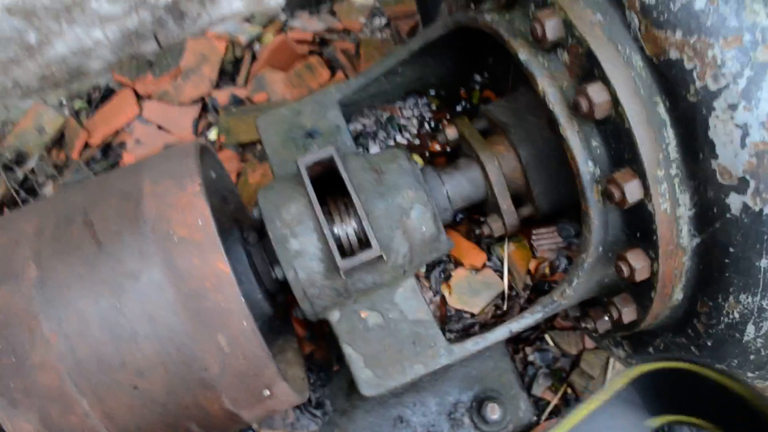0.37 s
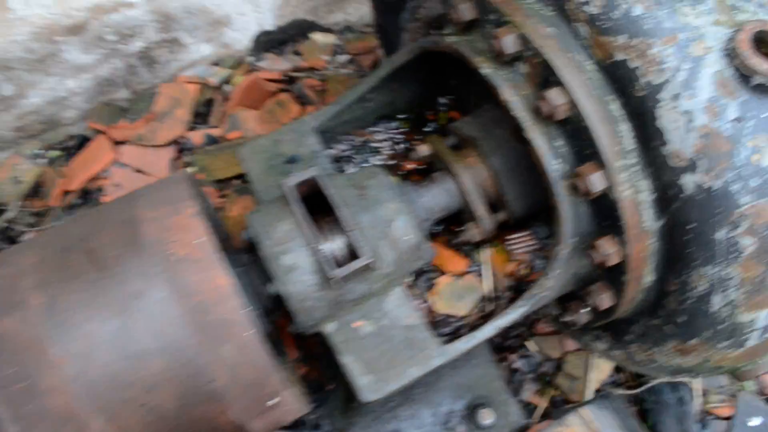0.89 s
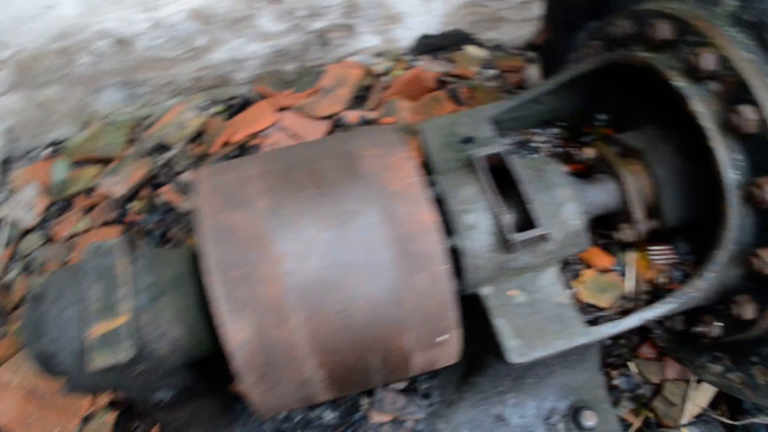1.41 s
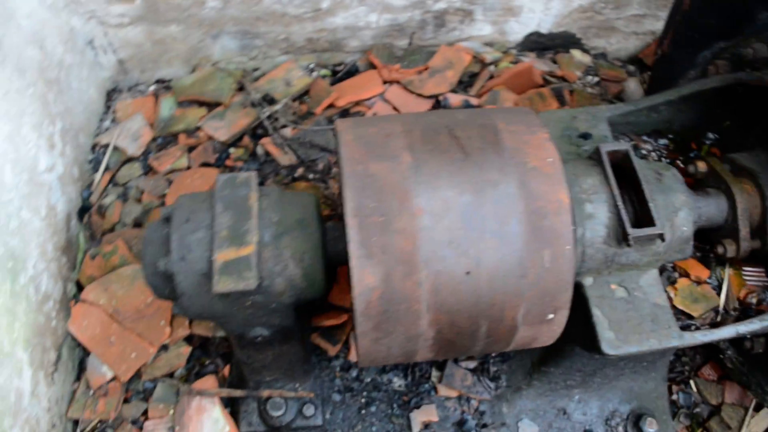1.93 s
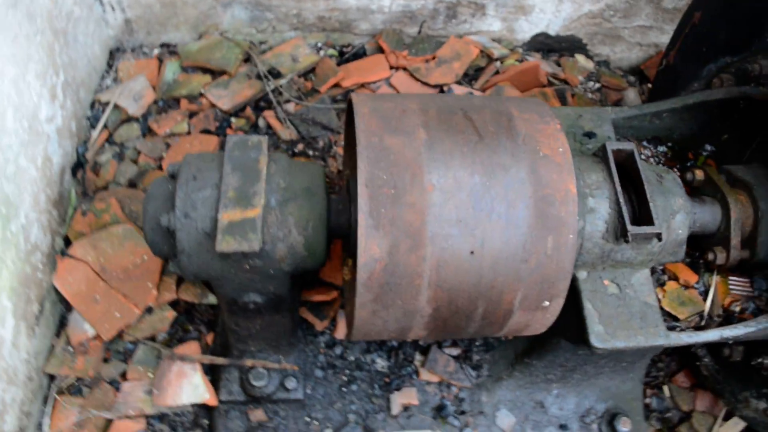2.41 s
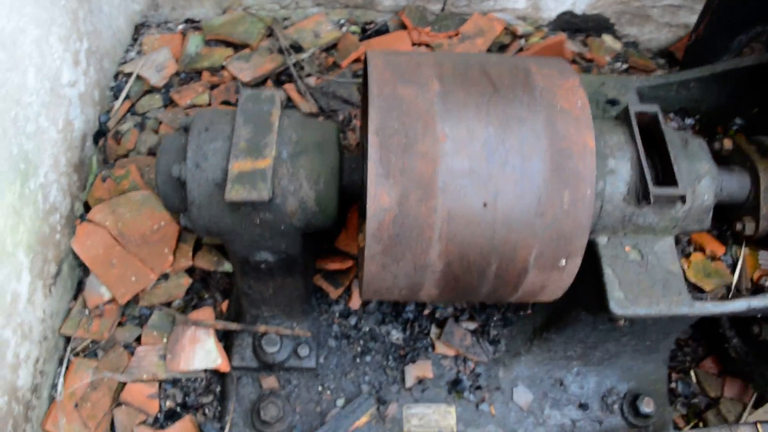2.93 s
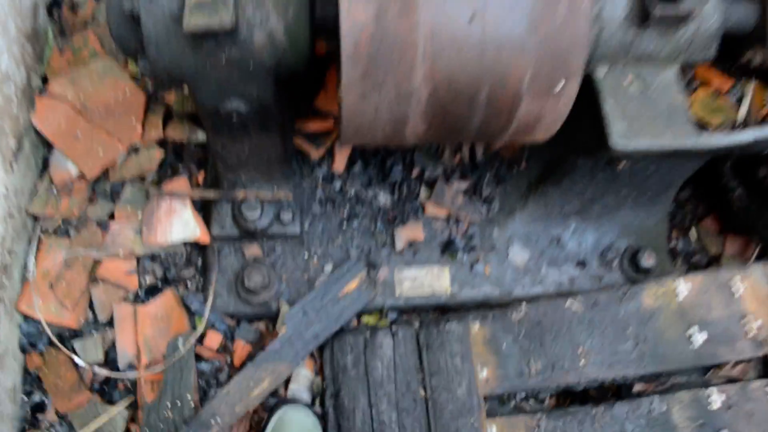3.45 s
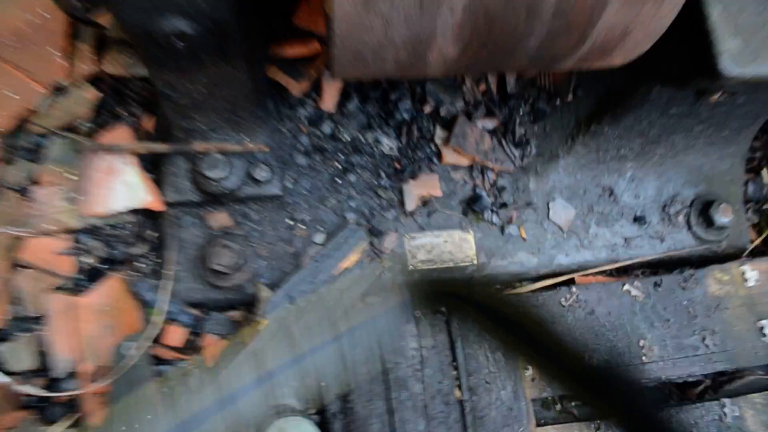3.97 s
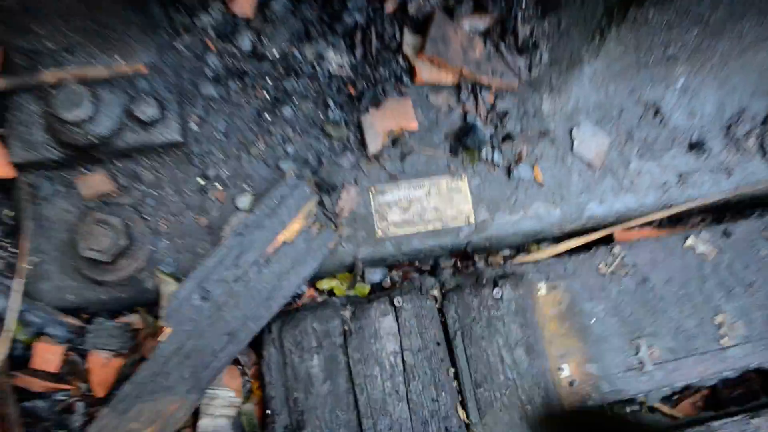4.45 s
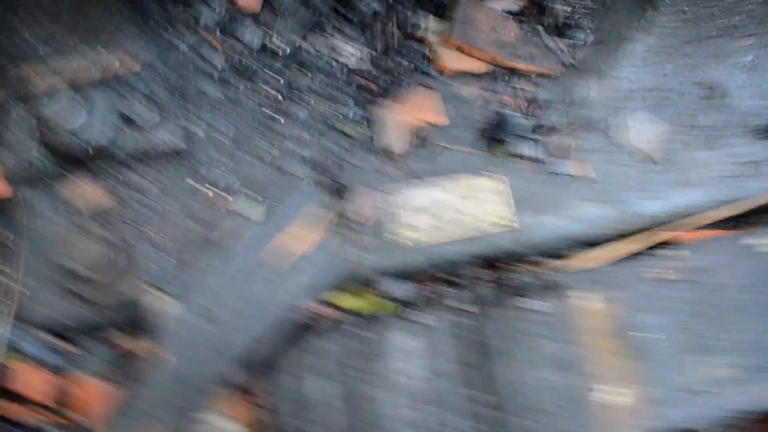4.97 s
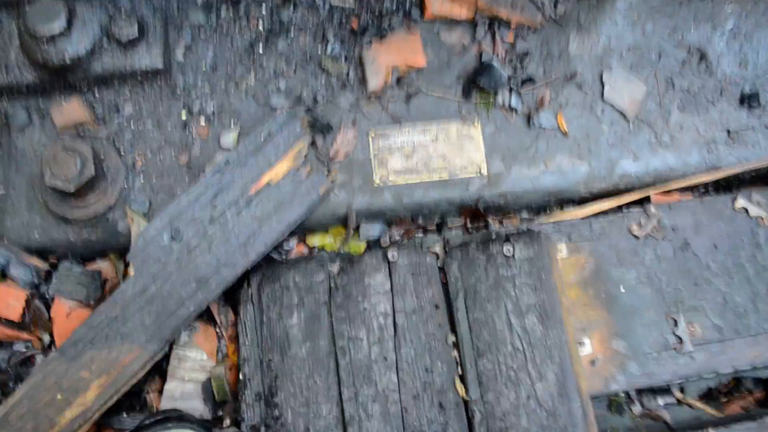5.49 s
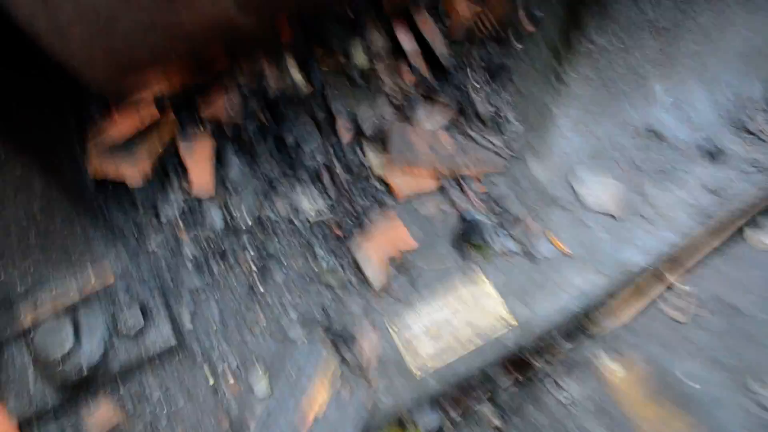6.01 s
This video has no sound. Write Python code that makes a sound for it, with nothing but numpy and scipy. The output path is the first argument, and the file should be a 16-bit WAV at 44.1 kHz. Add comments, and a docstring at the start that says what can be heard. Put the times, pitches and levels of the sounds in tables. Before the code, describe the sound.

Close to a small microphone in a roofless, hard-walled ruin, shoes shift on broken tiles and burnt planks. Small knocks, ticks and low creaks come sparsely, then a sharp bright tile clack and, half a second later, a heavier, lower double knock with plank thump, gritty crunch and tiny metal jingle. It settles into near quiet over distant traffic, ending with a few scrapes and snaps.

```python
"""Inside a roofless building, someone shifts their feet on broken roof tiles and charred planks.
Tiles knock, tick, snap and ping as struck decaying modes; planks thump as damped swings.
Scuffed grit, rustling cloth and creaking planks are shaped grains of noise; a small buckle jingles.
Behind lie a traffic wash of filtered noise, a low blurred engine tone and a faint electronic whine.
One small microphone hears it all, along with echoes from the walls."""
import sys
import numpy as np
from scipy import signal
from scipy.fft import rfft, irfft
from scipy.io import wavfile
from scipy.ndimage import uniform_filter1d

SR = 44100
rng = np.random.default_rng(int(sys.argv[2]) if len(sys.argv) > 2 else 0)


def attenuation_scalar(level_db):
    """Turn a level in dB into a linear amplitude multiplier (20 dB per decade)."""
    decades = np.asarray(level_db, float) / 20
    return 10 ** decades


def waveform_to_disk(signal):
    """Save audio, clipped to [-1, 1], as 16-bit WAV at the path in sys.argv[1]."""
    frames = np.transpose(np.atleast_2d(signal))
    scaled = np.clip(frames, -1, 1) * 32767
    samples = np.round(scaled).astype(np.int16)
    wavfile.write(sys.argv[1], SR, samples)


N = 269892  # length [samples]
# All source levels are those arriving at the microphone, before it rounds and filters them.


def evened(x):
    """Scales a signal to an rms of 1."""
    return x / np.sqrt(np.mean(x ** 2) + 1e-20)


def read(points, hz):
    """Reads a (frequency, value) table along a logarithmic frequency axis."""
    f, value = np.transpose(points)
    return np.interp(np.log(hz + 1), np.log(f + 1), value)


def curve(rows, axis):
    """Draws one column of a timed table as a line through the whole scene."""
    rows = np.array(rows)
    return np.interp(np.arange(N) / SR, rows[:, 0], rows[:, axis])


def add(mix, s, sound):
    """Lays a sound into the mix at a time in seconds, cutting what runs past the end."""
    part = mix[max(round(s * SR), 0):][:len(sound)]
    part += sound[:len(part)]


def peaked(x, db):
    """Scales a sound to a peak level in dB."""
    return attenuation_scalar(db) * x / np.abs(x).max()


def band(x, low_hz, high_hz, order=2):
    """Keeps the band between two frequencies."""
    sos = signal.butter(order, [low_hz, high_hz], "bandpass", fs=SR, output="sos")
    return signal.sosfilt(sos, x)


def ring(hz, t60, size=6000):
    """One struck mode: a sine that falls 60 dB in t60 seconds, never faster than in 2 ms."""
    t = np.arange(size) / SR
    return attenuation_scalar(-60 * t / max(t60, 0.002)) * np.sin(2 * np.pi * hz * t)


def coloured(x, points):
    """Weights the spectrum by a (frequency, dB) table and evens the result to an rms of 1."""
    hz = np.fft.rfftfreq(len(x), 1 / SR)
    return evened(irfft(rfft(x) * attenuation_scalar(read(points, hz)), len(x)))


# The tones that tiles and boards ring with: (frequency [Hz], level at 0 dB per octave brightness [dB])
RUBBLE_MODES = [(720, 15), (850, 18.5), (1000, 21), (1230, 14.5), (1500, 19), (1800, 18), (2050, 16),
                (2350, -12), (2750, -24), (3300, -10.5)]


def knock(hz, crunch_db, bright_db, noise):
    """A sharp blow, then crumbling, drives a hollow note and the rubble's modes, tilted by brightness."""
    crumble_s, rubble_t60, hollow_cycles = 0.005, 0.013, 5  # the hollow note falls 60 dB in 5 cycles
    contact = 0.27 * noise * np.exp(-np.arange(len(noise)) / (crumble_s * SR))
    contact[0] = 3  # the blow itself
    modes = np.zeros(1500)
    for (f, db), n in zip(RUBBLE_MODES, noise[::-1]):
        # each piece differs a little in pitch, and in the direction it first moves
        mode = ring(f * (1 + 0.067 * n), rubble_t60, size=1500)
        modes += attenuation_scalar(db + bright_db * np.log2(f / 1000)) * mode * np.sign(n)
    hollow = ring(hz, hollow_cycles / hz, size=1500)
    sound = peaked(signal.fftconvolve(contact, hollow), 0)
    add(sound, 0, peaked(signal.fftconvolve(contact, modes), crunch_db))
    return peaked(band(sound, 195, 4000, order=3), 0)


# Tiles and boards knocked by a shoe: (time [s], direct peak [dB], hollow pitch [Hz],
# crunch relative to the hollow note [dB], brightness [dB per octave])
TILE_KNOCKS = [(0.066, -27, 450, -14, 6), (0.124, -31.5, 704, -8, -3), (0.221, -36.5, 519, 1, -3),
               (0.257, -32.5, 342, 2, -12), (0.456, -17, 467, 7.5, 4.5), (0.738, -38, 495, 4, 2),
               (0.775, -28.5, 810, 3, -6), (0.997, -37, 506, -3, 4), (1.966, -26.5, 428, 12, 8),
               (2.372, -34.5, 760, 10, -5), (2.418, -37, 428, 0, -1), (2.449, -31.5, 580, -0.5, -9),
               (2.826, -29.5, 780, -7, -10), (2.914, -22, 814, 29, 0.5), (3.198, -23, 620, 1, -9),
               (3.266, -22.5, 624, -5.5, -15), (3.292, -13, 700, -11, -9), (3.2965, -13, 580, -7, -2),
               (3.309, -3, 610, -1.5, 8.5), (3.329, -16, 413, -0.5, 0), (3.382, -13.5, 616, -2, 2),
               (3.462, -30, 681, -2, -5), (3.473, -26, 600, -2, -5), (3.512, -25, 712, -10, -12),
               (3.537, -28, 700, 0, -3), (3.551, -28, 740, 3, -1), (3.706, -31.5, 743, 3, 1),
               (3.722, -30, 743, 4, 1), (3.751, -25, 791, 3, -2), (3.843, -2, 430, -3, -5),
               (3.85, -1.5, 440, -3, -10), (3.855, -11, 383, -8, 11), (3.867, -9, 400, 1, -6),
               (3.974, -23, 330, 0, -6), (4.019, -27, 785, 3, -1), (5.737, -31.5, 301, -3, 6),
               (5.765, -24.5, 322, 1, -26), (5.934, -25.5, 450, 3, -3)]


def knocks():
    """Every knock, direct and thrown back by the walls; each spot has its own echoes."""
    # faint knocks are further off and carry more echo
    echo_db, echo_db_per_db = -2, -0.1384  # echo share at a -26.5 dB knock, change per dB of peak
    out = np.zeros(N)
    noises = rng.standard_normal((len(TILE_KNOCKS), 2500))
    for (s, db, hz, crunch_db, bright_db), noise in zip(TILE_KNOCKS, noises):
        sound = attenuation_scalar(db) * knock(hz, crunch_db, bright_db, noise)
        add(out, s, sound)
        add(out, s, attenuation_scalar(echo_db + echo_db_per_db * (db + 26.5)) * walls(sound))
    return out


# Planks thumping under weight: (time [s], direct peak [dB], pitch [Hz], t60 [s])
PLANK_THUMPS = [(0.0, -25.5, 260, 0.14), (0.064, -33, 185, 0.071), (0.122, -38.5, 149, 0.08),
                (0.247, -43.5, 240, 0.16), (0.462, -40, 333, 0.11), (0.741, -40, 161, 0.085),
                (2.367, -47, 186, 0.13), (2.444, -39, 258, 0.19), (2.655, -39.5, 275, 0.18),
                (2.762, -35, 190, 0.085), (2.799, -34, 174, 0.08), (2.827, -29.5, 207, 0.058),
                (3.306, -22, 217, 0.11), (3.463, -37, 284, 0.062), (3.847, -15, 172, 0.097),
                (3.965, -22.5, 195, 0.061), (4.007, -29, 154, 0.1), (4.051, -29.5, 136, 0.094),
                (4.113, -30.5, 165, 0.12), (5.761, -36, 303.5, 0.17), (5.93, -52, 332, 0.12),
                (6.047, -48, 322, 0.084)]


def thumps():
    """A soft push sets a plank swinging at its bending pitch and a weaker partner."""
    push_s = 0.005
    onset = 1 - np.exp(-np.arange(9000) / (push_s * SR))
    out = np.zeros(N)
    for s, db, hz, t60 in PLANK_THUMPS:
        swing = ring(hz, t60, size=9000) + 0.46 * ring(1.355 * hz, 0.62 * t60, size=9000)
        add(out, s, peaked(swing * onset, db))
    return out + attenuation_scalar(-17) * walls(out)


# Dry snaps close by, with little echo: (time [s], direct peak [dB], ring [Hz],
# ring amplitude relative to the click before filtering [dB], top frequency [Hz])
DRY_SNAPS = [(0.458, -23, 1810, -14, 4000), (0.7795, -39, 4200, -6, 14000), (2.3734, -32, 3700, -12, 5000),
             (2.916, -26, 1500, -14, 4500), (3.3095, -35, 3800, -12, 6000), (3.752, -29, 1800, -14, 5000),
             (3.8453, -28, 5800, -6, 9000), (3.858, -32, 4000, -10, 14000), (3.876, -32, 5460, -6, 14000),
             (3.884, -34, 6500, -6, 14000), (5.9385, -16, 4100, -14, 3000)]


def snaps():
    """One abrupt break: a click and a very short ring, dulled above the piece's top frequency."""
    snap_t60, low_hz = 0.009, 350
    out = np.zeros(N)
    click = np.eye(1, 800)[0]
    for s, db, hz, ring_db, top_hz in DRY_SNAPS:
        sound = -click - attenuation_scalar(ring_db) * ring(hz, snap_t60, size=800)
        add(out, s, peaked(band(sound, low_hz, top_hz), db))
    return out + attenuation_scalar(-13) * walls(out)


# The louder shards clicking: (time [s], click peak [dB], ring [Hz],
# treble fizz relative to the click peak [dB], ring relative to the click peak [dB])
SHARD_TICKS = [(0.069, -55, 3030, -26, 6), (0.122, -51, 3570, -25, 1.5), (0.223, -51, 3360, -25, 8.5),
               (0.253, -51, 3020, -25, 9.5), (0.4593, -29, 3580, -22, -6.5), (0.741, -48.5, 4330, -16, -16),
               (0.7713, -45, 4300, -17, 2), (0.8085, -49, 4230, -21, -3), (0.9393, -49.5, 3250, -18, -4.5),
               (0.9986, -40, 3370, -15, -13), (1.0945, -52, 3650, -19, -12), (1.229, -58, 3100, 3, -10),
               (1.256, -50, 3100, -17, 0), (1.5429, -52, 4000, -33, 0.5), (1.8115, -43, 4040, -23, -12),
               (1.968, -42, 2920, -16, 11), (0.3276, -56, 2970, -13, 8), (0.166, -54, 3150, -23, 2),
               (2.149, -40.5, 3190, -16, -7), (2.373, -40.5, 3770, -21, -20), (2.4698, -54, 2950, -8, 11),
               (2.6778, -46, 3150, -7, -6), (2.688, -47, 3320, -23, -12), (2.7658, -46, 3500, -26, -4),
               (2.8877, -43, 3230, -20, -8), (2.915, -35, 3090, -20, 0.5), (3.2002, -37.5, 3100, -28, -13),
               (3.268, -47, 3750, -24, 1), (3.292, -42, 3050, -31, -12), (3.311, -37, 3930, -11, 15),
               (3.383, -25.5, 3360, -21, -19), (3.4497, -46, 3640, -12, -6), (3.469, -37, 3870, -28, -8),
               (3.4818, -37.5, 3820, -20, 4), (3.5279, -37, 3040, -11, -14), (3.6571, -47, 3150, -18, -6),
               (3.709, -41, 3140, -8, -8), (3.7514, -33, 3080, -23, -6), (3.7983, -43, 3850, -20, -13),
               (3.8442, -40, 3200, -15, -20), (3.857, -30, 3000, -18, -16), (3.875, -35, 3390, -28, -12),
               (3.931, -35, 3520, -25, -15), (4.002, -33, 3800, -31, -12), (4.0523, -30.5, 3530, -32, -16),
               (4.1785, -47, 5000, -20, -3), (4.2794, -53.5, 3700, -15, -9), (5.74, -38.5, 4150, -25.5, -6),
               (5.899, -45, 3660, -18, -8.5), (6.0407, -39, 3310, 0, -4)]


def ticks():
    """Each shard gives a dry click, a short fuzzy ring and a burst of fizz."""
    burst_t60, ring_t60 = 0.035, 0.0064  # [s]
    out = np.zeros(N)
    noises = rng.standard_normal((len(SHARD_TICKS), 3000))
    for (s, db, hz, fizz_db, ring_db), noise in zip(SHARD_TICKS, noises):
        burst = noise * attenuation_scalar(-60 * np.arange(3000) / SR / burst_t60)
        fuzzy_ring = signal.fftconvolve(burst, ring(hz, ring_t60, size=400))
        add(out, s, peaked(band(burst, 2110, 4180), db))
        add(out, s, peaked(fuzzy_ring, db + ring_db))
        add(out, s, peaked(band(burst, 4200, 13800, order=3), db + fizz_db))
    return out + attenuation_scalar(-7) * walls(out)


# Thin fragments that ping or squeak on one note: (time [s], peak [dB], pitch [Hz], t60 [s])
FRAGMENT_PINGS = [(0.162, -41, 1930, 0.088), (.16, -47, 2690, 0.11), (.185, -42, 1970, 0.054),
                  (.256, -36.5, 1408, 0.1), (1.966, -50, 5830, 0.079), (3.464, -49, 3980, 0.12),
                  (3.482, -59, 8400, .08), (5.738, -42, 4220, .03), (5.738, -49, 7300, 0.025),
                  (5.746, -36, 4150, 0.035), (5.86, -32, 1900, 0.046), (5.875, -35, 1220, .05),
                  (5.981, -41, 4150, 0.05), (5.999, -41, 3950, 0.05), (6.039, -45, 4280, 0.071)]


def pings():
    """A brief rough rub sets one note ringing."""
    rub_s = 0.007
    out = np.zeros(N)
    noises = rng.standard_normal((len(FRAGMENT_PINGS), 900))
    for (s, db, hz, t60), noise in zip(FRAGMENT_PINGS, noises):
        rub = noise * np.exp(-np.arange(900) / (rub_s * SR))
        add(out, s, peaked(signal.fftconvolve(rub, ring(hz, t60)), db))
    return out


# Feet scuffing and weight shifting: (time of peak [s], time to fade 10 dB before stretching [s],
# grit [dB], cloth [dB], plank creak [dB])
FOOT_SCUFFS = [(0.0, .05, -44, -60, -44), (0.09, 0.15, -53.5, -82, -49), (0.2, 0.04, -52, -76, -56),
               (0.275, .06, -51, -69, -47), (0.34, .06, -55, -75, -53), (0.4, .06, -58, -77, -57.5),
               (0.475, 0.03, -46, -66, -47), (0.762, 0.04, -51.5, -63, -42.5),
               (0.88, 0.02, -64, -67, -60.5), (0.97, 0.03, -51, -67, -52), (1.03, 0.05, -49, -64, -57.5),
               (1.1, 0.02, -62, -69, -62), (1.27, 0.1, -63, -68, -64), (1.5, 0.2, -66, -82, -57),
               (1.88, .1, -70, -75, -59), (2.0, 0.07, -50, -76, -49.5), (2.1, 0.1, -53, -82, -49.5),
               (2.33, 0.1, -60, -75, -60), (2.43, .04, -52, -73, -48), (2.47, 0.0539, -46, -67, -43),
               (2.68, 0.09, -48.5, -73, -44.5), (2.8, 0.04, -50.5, -80, -41.5), (2.88, 0.03, -51, -70, -48),
               (2.94, 0.11, -52, -72, -58), (3.22, .1, -53, -73, -60), (3.34, 0.0271, -32.5, -66, -50),
               (3.38, 0.02, -45, -65, -40), (3.44, 0.07, -44, -72, -44), (3.54, 0.035, -40.5, -60, -48),
               (3.62, .05, -50, -68, -55), (3.71, .06, -43, -64.5, -53), (3.78, .08, -38.5, -59, -48),
               (3.87, 0.0521, -34, -50, -40), (3.92, 0.0629, -37.5, -53.5, -32.5),
               (3.97, 0.06, -41, -62, -37), (4.02, .04, -38, -56, -45), (4.07, .04, -46, -60, -48),
               (4.14, 0.08, -46.5, -73, -41.5), (4.3, 0.21, -51.5, -68.5, -54),
               (4.55, 0.26, -58, -69.5, -52), (4.72, .1, -65, -73, -62.5), (4.9, 0.08, -55.5, -67, -53.5),
               (5.28, 0.2, -57, -67.5, -60), (5.5, 0.2, -55.5, -69.5, -57), (5.63, 0.14, -58, -70, -55),
               (5.73, 0.07, -50, -69, -56), (5.779, .04, -47, -68, -38), (5.84, .04, -48, -55, -61),
               (5.88, .04, -45, -68, -55), (5.925, .04, -36, -56, -50), (5.98, 0.07, -45, -59, -44),
               (6.045, .04, -43.5, -56, -46), (6.09, .04, -47, -62, -45)]
# Levels while standing still: (grit [dB], cloth [dB], creak [dB])
STILL_LEVELS = (-82, -85, -58.5)
# Stretch of each scuff's time: (grit [factor], cloth [factor], creak [factor])
SCUFF_STRETCH = (1, 1.19, 0.89)


def scuffing():
    """Each scuff swells to its peak and fades; powers add. Gives the gains of grit, cloth and creak."""
    rise_share = 0.75  # a scuff swells in this share of its fading time
    roundness = 1.33  # 1 = pointed peak, 2 = rounded swell
    t = np.arange(0, N, 64) / SR
    power = attenuation_scalar(np.array(STILL_LEVELS))[:, None] ** 2
    for s, fade_s, *levels_db in FOOT_SCUFFS:
        distance_s = np.where(t < s, (s - t) / rise_share, t - s)
        away = distance_s / fade_s / np.array(SCUFF_STRETCH)[:, None]
        power = power + attenuation_scalar(np.array(levels_db)[:, None] - 10 * away ** roundness) ** 2
    return [np.interp(np.arange(N) / SR, t, np.sqrt(p)) for p in power]


def grains(per_s, spread_db, ms):
    """Sparse puffs of noise, a few much larger than the rest, each decaying over some milliseconds."""
    size = attenuation_scalar(spread_db * np.minimum(rng.exponential(1, N), 4))
    size = size * (rng.random(N) < per_s / SR)
    puff = np.exp(-np.arange(800) / (ms * SR / 1000))
    return signal.oaconvolve(size, puff)[:N] * rng.standard_normal(N)


# Colour of grit under soles: (frequency [Hz], relative level [dB])
GRIT_COLOUR = [(150, -33), (400, -5), (900, 2), (2000, 1), (4000, -11), (5500, -24.5), (8000, -57),
               (16000, -70)]
# Colour of brushing cloth: (frequency [Hz], relative level [dB])
CLOTH_COLOUR = [(2000, -10), (4500, 9.5), (7000, 3.5), (11000, 2.5), (13500, -2), (15800, -34)]
# Colour of creaking planks: (frequency [Hz], relative level [dB])
PLANK_COLOUR = [(80, -15.5), (150, 8), (250, 3), (450, 1.5), (900, -38)]


def shuffle():
    """Grit grinding under soles, cloth brushing, planks creaking low; grit and creak echo."""
    grit_gain, cloth_gain, creak_gain = scuffing()
    grit = grit_gain * coloured(grains(1100, spread_db=4, ms=2.04), GRIT_COLOUR)
    cloth = cloth_gain * coloured(grains(1500, spread_db=1.6, ms=4.8), CLOTH_COLOUR)
    creak = creak_gain * coloured(grains(150, spread_db=3.7, ms=4.8), PLANK_COLOUR)
    return grit + cloth + creak + attenuation_scalar(-8.5) * walls(grit + creak)


# The buckle shaken: (time [s], peak [dB])
BUCKLE_SHAKES = [(3.8438, -57), (3.8608, -40), (3.8753, -32), (3.9301, -35), (4.0015, -32.5), (4.0509, -39)]
# The buckle's modes: (frequency [Hz], level before uneven striking [dB], t60 [s])
BUCKLE_MODES = [(5400, -2, .006), (6850, 0, .01), (7900, -2, .006), (9100, -2, .008), (10200, -1, .012),
                (11200, -2, .006), (12700, -3, .016), (13600, -4, .005)]


def buckle():
    """Each shake rattles the metal for some milliseconds, its modes struck unevenly."""
    out = np.zeros(N)
    noises = rng.standard_normal((len(BUCKLE_SHAKES), 1500))
    for (s, db), noise in zip(BUCKLE_SHAKES, noises):
        modes = np.zeros(2000)
        for (hz, level, t60), n in zip(BUCKLE_MODES, noise):
            modes += attenuation_scalar(level + 2.8 * n) * ring(hz, t60, size=2000)
        rattle = noise * np.exp(-np.arange(1500) / 250)
        add(out, s, peaked(signal.fftconvolve(rattle, modes), db))
    return out


# The heaviest step shakes the floor: (time [s], peak [dB], pitch [Hz], rise [s], fade [dB per s])
FLOOR_BOOM = (3.835, -30, 52, .05, 70)


def boom():
    """The floor swings slowly up and dies away."""
    s, db, hz, rise_s, fade_db = FLOOR_BOOM
    t = np.maximum(np.arange(N) / SR - s, 0)
    swell = np.minimum(t / rise_s, 1)
    fade = attenuation_scalar(db - fade_db * np.maximum(t - rise_s, 0))
    return swell * fade * np.sin(2 * np.pi * hz * t)


# How long the walls hold each band: (frequency [Hz], t60 [s])
WALL_DECAY = [(120, 0.67), (330, 0.17), (870, 0.31), (2300, 0.22), (6000, 0.2)]


def walls(x):
    """Echoes of random sign: a quick scatter from nearby heaps, each band dying at its own speed."""
    taps = np.zeros(SR // 2)
    at = np.arange(150, SR // 2 - 20, 20)
    taps[at + rng.integers(0, 20, len(at))] = rng.choice([-1., 1.], len(at))
    hz, t, z = signal.stft(taps, SR, nperseg=256)
    slow = attenuation_scalar(-60 * t / read(WALL_DECAY, hz)[:, None])
    scatter = 0.66 * attenuation_scalar(-60 * t / 0.051)
    tail = signal.istft(z * (slow + scatter), SR, nperseg=256)[1]
    return signal.oaconvolve(x, tail / np.linalg.norm(tail))[:N]


# Colour of the distant traffic: (frequency [Hz], relative density [dB per Hz])
TRAFFIC_COLOUR = [(12, -24), (20, -20.5), (59, -8), (109, -7.5), (166, -14.5), (352, -8), (705, -1.5),
                  (958, -1.5), (1580, -10.5), (2540, -21), (4430, -30.5), (6360, -43), (10500, -41),
                  (14300, -51), (15500, -62)]


def traffic():
    """A smooth wash of distant traffic: noise with faint drifting patches in time and frequency."""
    frames = N // 256 + 5
    a, b, patches = rng.standard_normal((frames, 513, 3)).T
    patches = uniform_filter1d(patches, 10, 0)  # over frequency
    patches = evened(uniform_filter1d(patches, 16, 1))  # over time
    spectrum = (a + 1j * b) * attenuation_scalar(0.68 * patches)
    wash = signal.istft(spectrum, nperseg=1024, noverlap=768)[1][:N]
    return attenuation_scalar(-47.5) * coloured(wash, TRAFFIC_COLOUR)


# An engine far off: (time [s], level [dB])
ENGINE_LEVEL = [(0.0, -54), (0.4, -59.5), (0.82, -54.5), (1.26, -59), (1.46, -54), (2.11, -59), (2.22, -49),
                (2.98, -60), (3.08, -53), (3.6, -44.5), (3.73, -58), (3.9, -50), (4.05, -38), (4.15, -42),
                (4.24, -53), (4.65, -44.5), (4.84, -52.5), (5.11, -50), (6.12, -52.5)]


def rumble():
    """A low tone blurred by a wandering strength and phase."""
    engine_hz, wander_hz = 57.2, 14
    lowpass = signal.butter(2, wander_hz, fs=SR, output="sos")
    wander = signal.sosfilt(lowpass, rng.standard_normal((2, N)))
    blur = 0.37 + evened(wander[0]) + 1j * evened(wander[1])
    tone = (blur * np.exp(2j * np.pi * engine_hz * np.arange(N) / SR)).real
    return attenuation_scalar(curve(ENGINE_LEVEL, axis=1)) * evened(tone)


# A thin electronic whine that wavers in level: (time [s], rms level [dB])
WHINE_LEVEL = [(0.0, -87), (2.1, -79), (2.32, -75), (2.5, -83), (2.88, -80), (3.0, -94), (3.2, -86),
               (4.1, -89), (5.1, -83), (5.6, -91), (6.12, -75.5)]


def whine():
    """A pure high tone at a steady pitch."""
    whine_hz = 15656
    tone = np.sqrt(2) * np.sin(2 * np.pi * whine_hz * np.arange(N) / SR)
    return attenuation_scalar(curve(WHINE_LEVEL, axis=1)) * tone


def scene():
    """Everything heard at one point."""
    feet = knocks() + thumps() + ticks() + snaps() + pings() + buckle() + shuffle() + boom()
    return (feet + traffic() + rumble() + whine())[None]


def band_limit(x):
    """A steep low-pass at the top of the band."""
    return signal.sosfilt(signal.butter(12, 16090, fs=SR, output="sos"), x)


def record(dry):
    """A small microphone that rounds off the loudest peaks and cuts the treble steeply."""
    rounded = 0.76 * np.tanh(dry / 0.8)
    treble_cut = signal.firwin(601, 16000, fs=SR)[None]
    finished = signal.oaconvolve(rounded, treble_cut, "same")
    return band_limit(finished)


dry = scene()
out = record(dry)
waveform_to_disk(out)
```